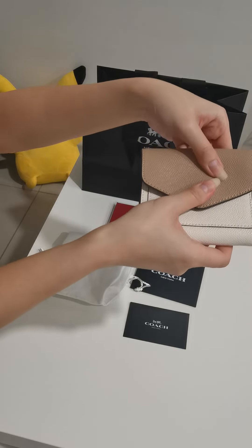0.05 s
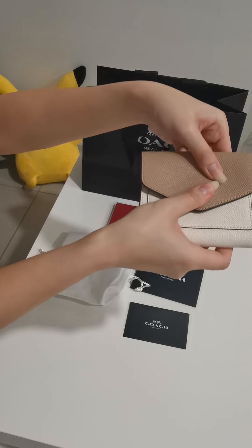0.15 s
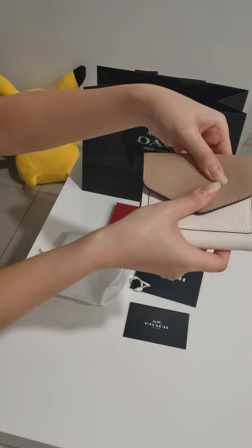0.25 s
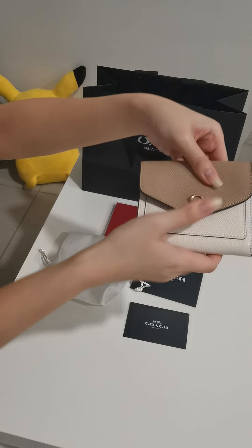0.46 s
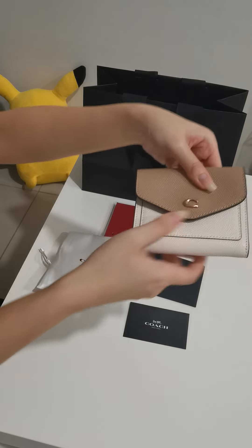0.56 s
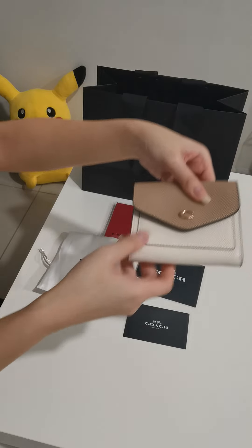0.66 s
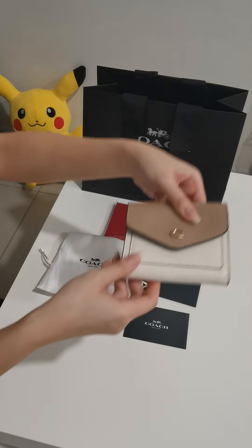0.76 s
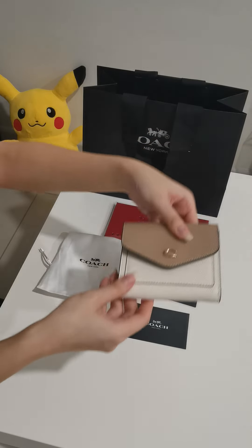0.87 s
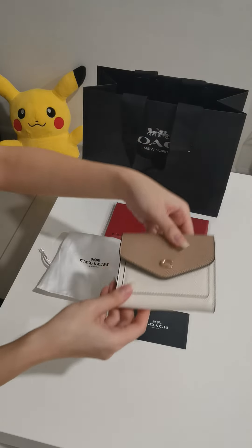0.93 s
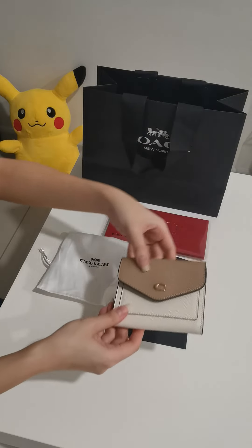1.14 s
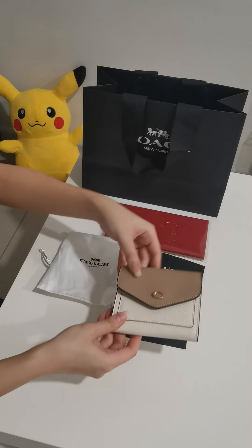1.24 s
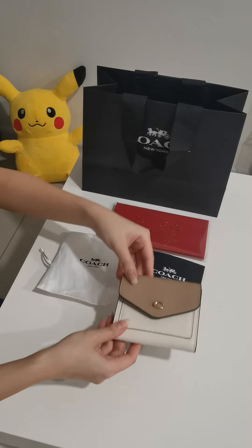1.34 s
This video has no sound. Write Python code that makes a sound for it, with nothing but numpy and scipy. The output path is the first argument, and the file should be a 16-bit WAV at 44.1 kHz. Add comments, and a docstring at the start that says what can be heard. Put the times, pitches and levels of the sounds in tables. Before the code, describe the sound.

One sharp click of a leather wallet's snap closing, then soft handling and a small clink.

```python
"""Over quiet room tone and a soft rumble, fingers rub on a leather wallet held above a table. Its metal
snap seats with a tick, then pops home at 0.16 s: one impulse excites damped modes, heard as a sharp
click. Nearby surfaces reflect it and the bare room reverberates. Near 0.5 s fingers tap and shift on
the leather. Just after 1 s, as the wallet is lowered, they tap again and its loose metal ring strikes
and rebounds in a single clink, while a low drone swells and fades."""
import sys
import numpy as np
from scipy import signal
from scipy.fft import rfft, irfft, next_fast_len
from scipy.io import wavfile

SR = 44100
rng = np.random.default_rng(int(sys.argv[2]) if len(sys.argv) > 2 else 0)


def file_out(sig):
    """Save sig as 16-bit WAV at sys.argv[1]."""
    # one column per channel
    cols = np.atleast_2d(sig).T
    # limit, then scale
    lim = np.clip(cols, -1, 1)
    pcm = np.round(lim * 32767).astype(np.int16)
    wavfile.write(sys.argv[1], SR, pcm)


N = 61739
SIZE = next_fast_len(2 * N)
HZ = np.fft.rfftfreq(SIZE, 1 / SR)
T = np.arange(N) / SR

# Spectra of the four noises. Each row: frequency in Hz, relative spectral density in dB.
TONE_SPECTRUM = [(25, -6.5), (48, 2), (80, -5.5), (170, -13), (280, -13.5), (420, -16), (1000, -18),
                 (2000, -25), (4500, -30), (6000, -37), (9500, -41.5), (11300, -36), (14000, -43.5),
                 (15800, -43.5)]
RUMBLE_SPECTRUM = [(20, -51), (110, -19), (150, -2.5), (180, -1.5), (230, -8), (290, -8.5), (400, -20),
                   (1500, -54), (8000, -91)]
DRONE_SPECTRUM = [(20, -61.5), (105, -31), (122, -6.5), (130, 3), (138, -13), (160, -28), (300, -37.5),
                  (2000, -100)]
FRICTION_SPECTRUM = [(100, -26.5), (400, 4), (1200, -0.5), (2500, -1), (4200, -1), (6000, -15.5),
                     (11500, -18), (16000, -29)]
# Likeness of left and right in these noises. Each row: frequency in Hz, coherence from 0 to 1.
COHERENCE = [(60, .68), (150, 0.53), (400, .45), (1000, 0.0048), (4000, 0), (12000, 0)]
# Envelopes of rumble and drone. Each row: time in seconds, level in dB.
RUMBLE_LEVELS = [(0, -64), (.13, -62.5), (.22, -80), (.36, -73.5), (.44, -65), (.6, -66.5), (.74, -61.5),
                 (.86, -66.5), (1.08, -60.5), (1.2, -65.5), (1.4, -64)]
DRONE_LEVELS = [(0, -61.5), (.3, -91.5), (.72, -73.5), (.86, -61), (1.0, -57.5), (1.12, -64.5), (1.4, -71)]
# Early reflections off table, bag and walls. Each row: delay in ms, gain in dB, right-side lag in ms.
REFLECTIONS = [(1.496, -23.5, -0.03), (4.727, -22.5, 0.29), (12.42, -19, 0.17), (13.79, -18, 0.079),
               (15.74, -24, -0.2), (17.17, -15.5, .1), (20.78, -19.5, 0.13), (32.36, -24.5, -.1)]
# Decay of the room. Each row: frequency in Hz, reverberation time in seconds.
REVERB_TIMES = [(200, 1), (900, 0.71), (2000, 0.7), (4000, 0.72), (7000, 0.79), (11000, .5), (15000, .3)]
# Colour of the reverberation, and that shared by snap and taps. Each row: frequency in Hz, gain in dB.
REVERB_COLOUR = [(150, -12), (500, -9.5), (650, -4.5), (820, 4), (1100, -2), (1500, 2.5), (3000, 1),
                 (4000, -3), (6000, 0.5), (11000, -2.5), (15000, -9)]
CONTACT_COLOUR = [(60, -16), (200, -5), (350, -2), (4850, -1), (5400, -9.5), (6400, -6), (7500, -19.5),
                  (8500, -6), (9800, -7), (11000, 2.5), (12200, 0), (13500, -18.5), (16000, -20)]
# Fingers sliding on leather. Each row: centre in seconds, length in seconds, peak level in dB.
SLIDES = [(0.049, 0.17, -69.5), (0.136, 0.04, -62), (0.588, 0.027, -71.5), (1.03, 0.3, -72),
          (1.174, 0.056, -78.5)]
# Light contacts. Each row: start in seconds, level in dB, tilt in dB per octave,
# knock frequency in Hz, knock level in dB, left over right in dB.
TAPS = [(0.1176, -16, -13, 490, -17, 2), (0.1198, -9, -3.5, 500, -8.5, 5), (0.122, -24, -3, 1330, -18, 13),
        (.491, -36.5, 1.5, 1390, -25, 2), (0.5106, -22.5, -3.5, 1089, -20, 2),
        (0.5476, -29, 1, 1040, -7, -3), (1.0241, -27, -1.5, 1110, -24, -4),
        (1.058, -18, -2.5, 1470, -28, -5)]
# The ring's strike and rebound. Each row: start in seconds, level in dB.
RING_STRIKES = [(1.0569, -29), (1.0585, -24)]
# Modes of the tapped wallet, its metal ring and the snap in its leather flap.
# Each row: frequency in Hz, bandwidth in Hz, peak gain in dB.
WALLET_RESONANCES = [(700, 130, -10), (1280, 390, -2.5), (1680, 400, -6), (2870, 500, -11),
                     (3660, 500, -4.5), (4300, 500, -5.5), (7600, 630, -6.5), (11600, 2500, -21)]
RING_RESONANCES = [(2760, 350, -7.5), (4200, 550, -15), (7420, 1200, -6), (11700, 1000, -7.5),
                   (12580, 130, -1.5), (14400, 1200, -16)]
SNAP_RESONANCES = [(366, 160, -19.5), (1005, 170, -5), (1866, 390, -14), (2900, 490, -7), (3788, 913, 1),
                   (4530, 300, -3.5), (10600, 3000, -19.5)]
# Balance of the snap's direct sound. Each row: frequency in Hz, left over right in dB.
SNAP_PAN = [(400, 3), (700, 0.5), (1150, -4), (2300, 1), (4400, -1.5), (8000, -4), (10500, -2), (12500, 3),
            (15000, 3.5)]


def amp(db):
    """Amplitude ratio of a level in decibels."""
    return 10 ** (np.asarray(db) / 20)


def along(points, hz):
    """Interpolation of (Hz, value) points on a logarithmic frequency axis."""
    freqs, values = np.transpose(points)
    return np.interp(np.log(hz + 1), np.log(np.abs(freqs) + 1), values)


def swell(curve):
    """Amplitude envelope through (seconds, dB) points."""
    return amp(np.interp(T, *np.transpose(curve)))


def fade(t, t60):
    """Exponential decay by 60 dB in t60 seconds."""
    return np.exp(-np.log(1000) * t / t60)


def causal(gain):
    """Minimum-phase response with this gain, by folding the cepstrum onto positive time."""
    cepstrum = irfft(np.log(np.maximum(gain, 1e-6)), SIZE)
    cepstrum[1:SIZE // 2] *= 2
    cepstrum[SIZE // 2 + 1:] = 0
    return np.exp(rfft(cepstrum))


def resonances(modes):
    """Gain of a body whose modes are damped oscillators, summed in power."""
    return np.sqrt(sum((amp(db) * HZ * width) ** 2 / ((hz ** 2 - HZ ** 2) ** 2 + (HZ * width) ** 2)
                       for hz, width, db in modes))


def delay(seconds):
    """A pure delay: phase lag proportional to frequency."""
    return np.exp(-2j * np.pi * HZ * seconds)


def place(pan_db, lag_ms=0):
    """Direction as level and time differences: left louder by pan_db, right later by lag_ms."""
    return np.array([amp(pan_db / 2) * delay(0), amp(-pan_db / 2) * delay(lag_ms / 1000)])


def unit_spectra(channels):
    """Spectrum of each channel, normalised to an energy of 1."""
    return rfft(channels / np.linalg.norm(channels, axis=1, keepdims=True), SIZE)


def noise(spectrum):
    """Partially coherent stereo noise of rms 1, alike in the bass and independent in the treble."""
    angle = np.arccos(np.clip(along(COHERENCE, HZ), -1, 1)) / 2
    coloured = rfft(rng.standard_normal((2, SIZE))) * amp(along(spectrum, HZ))
    mid, side = coloured * [np.cos(angle), np.sin(angle)]
    stereo = irfft(np.array([mid + side, mid - side]) * place(pan_db=-2), SIZE)[:, :N]
    return stereo / stereo.std()


def background():
    """Superposed noise bands: steady room tone, and a rumble and drone slowly modulated in amplitude."""
    tone = amp(-62.5) * noise(TONE_SPECTRUM)
    rumble = swell(RUMBLE_LEVELS) * noise(RUMBLE_SPECTRUM)
    drone = swell(DRONE_LEVELS) * noise(DRONE_SPECTRUM)
    return tone + rumble + drone


def room():
    """Room response: early reflections, scattering from things on the table, a decaying diffuse field."""
    early = sum(amp(db) * delay(ms / 1000) * place(pan_db=-3.5, lag_ms=lag)
                for ms, db, lag in REFLECTIONS)
    scatter_envelope = fade(T, t60=0.026) * (1 - fade(T, t60=0.013))
    scatter = amp(-11.5) * unit_spectra(rng.standard_normal((2, N)) * scatter_envelope)
    hz, t, bands = signal.stft(rng.standard_normal((2, N)), SR, nperseg=256)
    decaying = signal.istft(bands * fade(t, along(REVERB_TIMES, hz)[:, None]), SR)[1][:, :N]
    build_up = 1 - np.exp(-T / 0.0034)
    tail = amp(-7) * unit_spectra(decaying * build_up) * delay(seconds=0.011)
    return early + scatter + tail * causal(amp(along(REVERB_COLOUR, HZ))) * place(pan_db=-1.5)


def finger_rubs():
    """Sliding friction: noise under Gaussian envelopes as the grip shifts on the leather."""
    envelope = sum(amp(db) * np.exp(-(2 * (T - centre) / length) ** 2) for centre, length, db in SLIDES)
    return noise(FRICTION_SPECTRUM) * envelope


def taps():
    """Impact excitation: each contact and its brief scuff drive the wallet's modes, with a dull knock."""
    out, reflected = 0, room()
    knock_width_hz = 120
    octaves = np.log2(HZ / WALLET_RESONANCES[0][0] + 0.1)  # from about the lowest mode
    for start, db, tilt_db, knock_hz, knock_db, pan_db in TAPS:
        scuff = amp(-5) * unit_spectra(rng.standard_normal((1, N)) * fade(T, t60=0.036))
        body = causal(resonances(WALLET_RESONANCES) * amp(db + tilt_db * octaves))
        knock = causal(resonances([(knock_hz, knock_width_hz, knock_db)]))
        contact = (1 + scuff) * body + knock  # 1 is the spectrum of an impulse
        out = out + contact * delay(start) * (place(pan_db) + reflected)
    return out


def ring_clink():
    """Free vibration of the ring after it strikes its mount and rebounds; much is heard via the room."""
    strikes = sum(amp(db) * delay(start) for start, db in RING_STRIKES)
    return strikes * causal(resonances(RING_RESONANCES)) * (place(pan_db=-4) + amp(4) * room())


def snap():
    """Impulse response of stud and flap as the snap pops home; leather damps it within milliseconds."""
    click = amp(15.5) * causal(resonances(SNAP_RESONANCES)) * delay(seconds=0.1604)
    direct = place(along(SNAP_PAN, HZ), lag_ms=0.081)
    return click * (direct + room())


def scene():
    """Linear superposition of snap, taps and clink with the friction and the background."""
    contacts = (snap() + taps()) * causal(amp(along(CONTACT_COLOUR, HZ)))
    impacts = irfft(contacts + ring_clink(), SIZE)[:, :N]
    return impacts + finger_rubs() + background()


def record(dry):
    """Soft saturation rounds the highest peak; a steep low-pass filter then limits the bandwidth."""
    ceiling, cutoff_hz = amp(-5.5), 15950
    limited = dry / (1 + (dry / ceiling) ** 12) ** (1 / 12)
    return irfft(rfft(limited, SIZE) / np.sqrt(1 + (HZ / cutoff_hz) ** 160), SIZE)[:, :N]


dry = scene()
out = record(dry)
file_out(out)
```